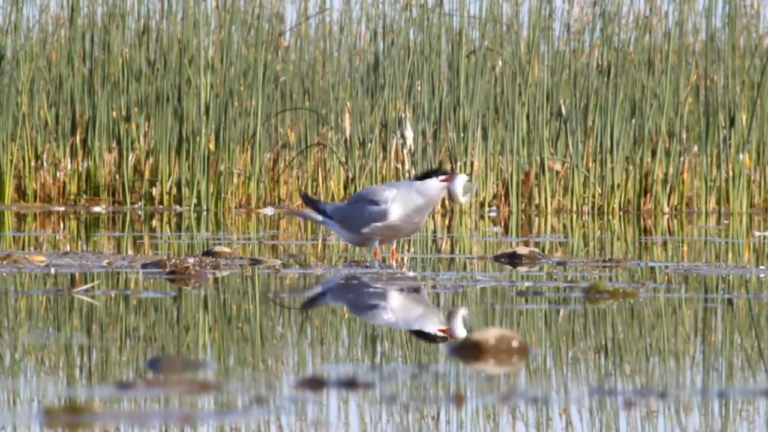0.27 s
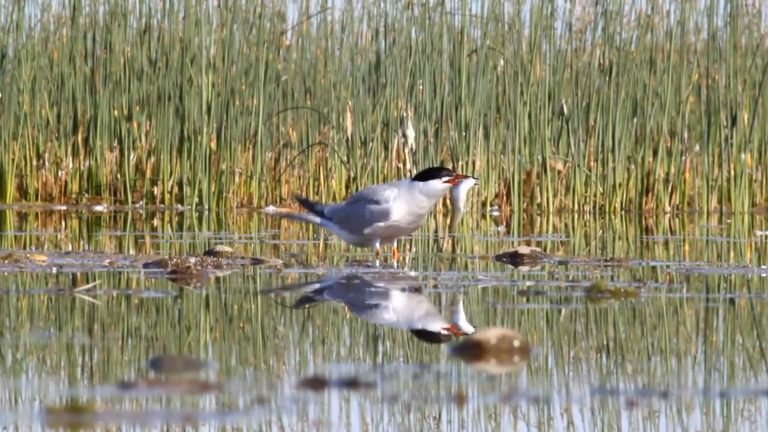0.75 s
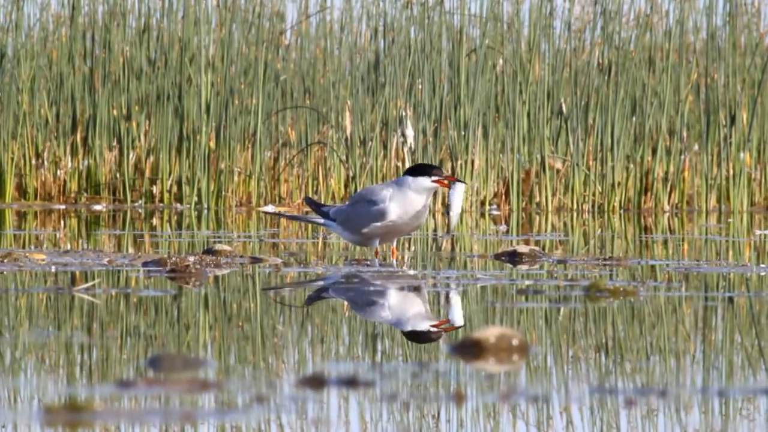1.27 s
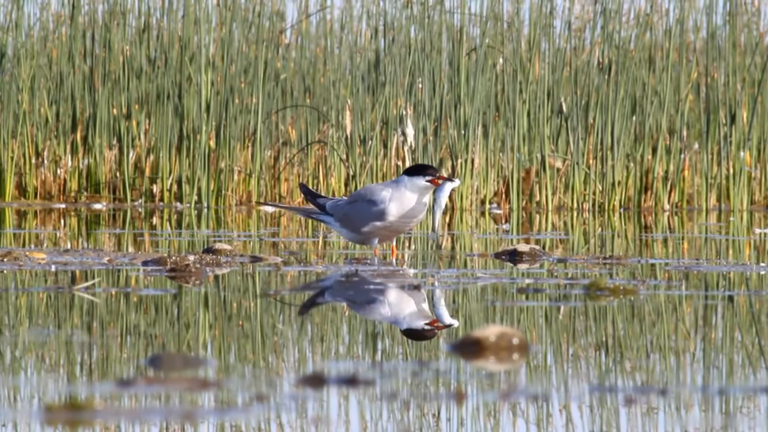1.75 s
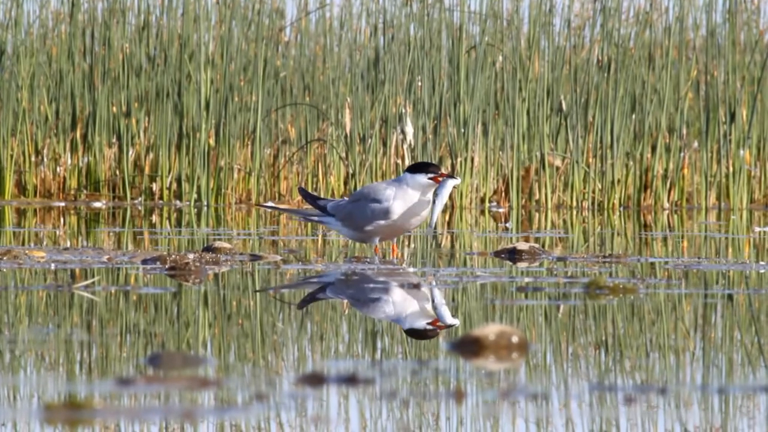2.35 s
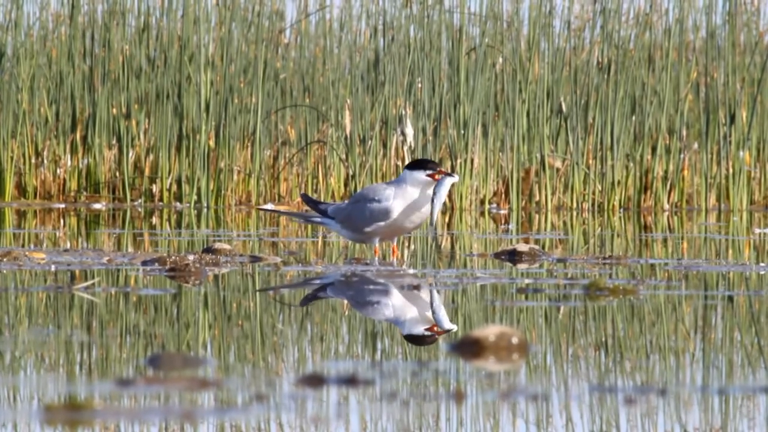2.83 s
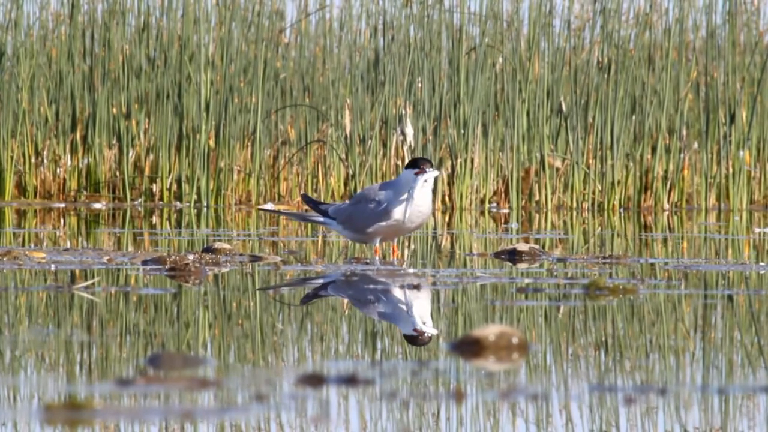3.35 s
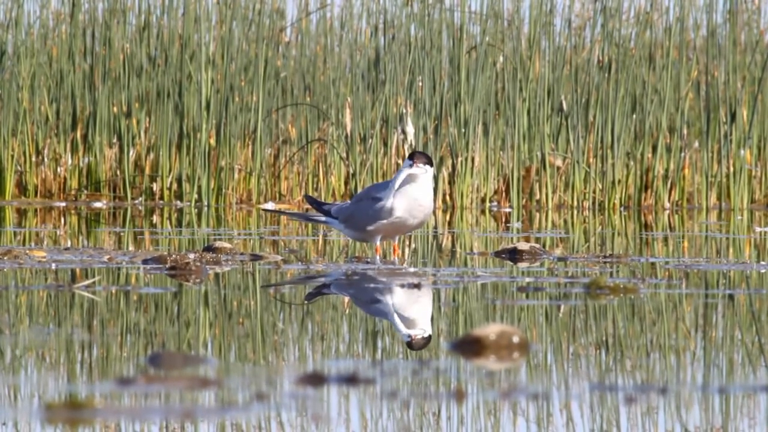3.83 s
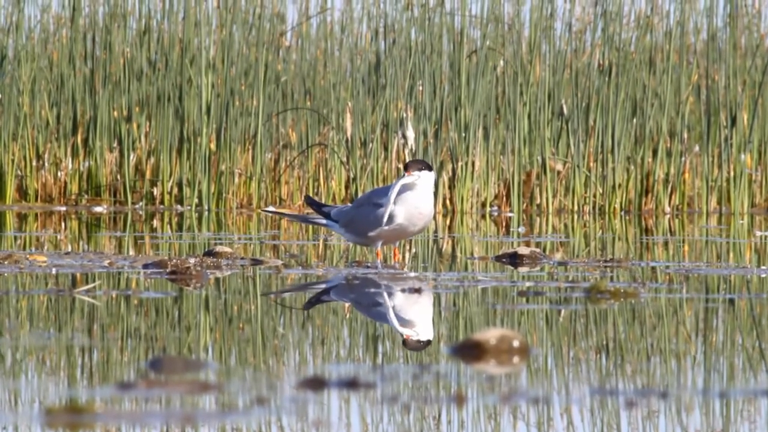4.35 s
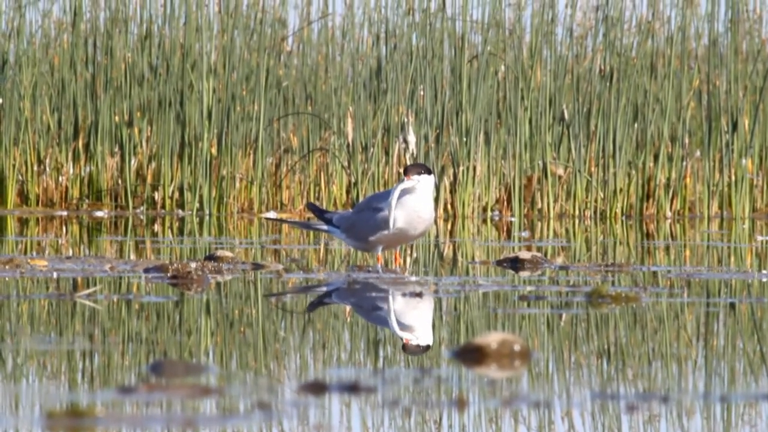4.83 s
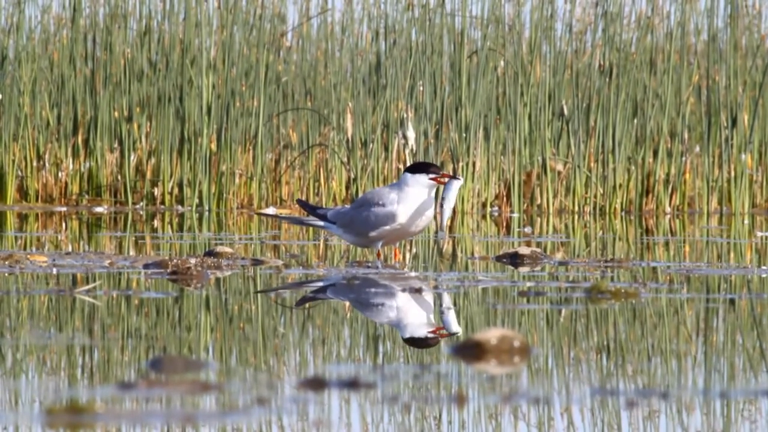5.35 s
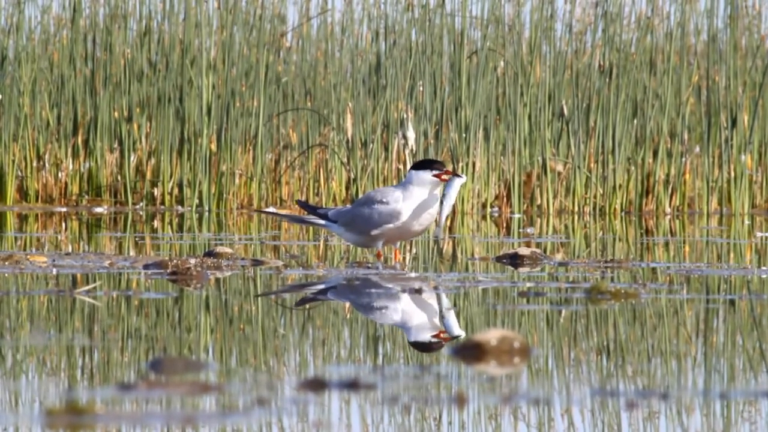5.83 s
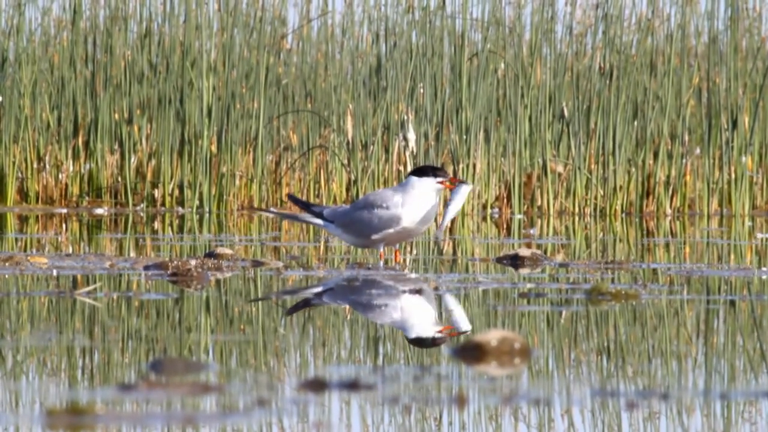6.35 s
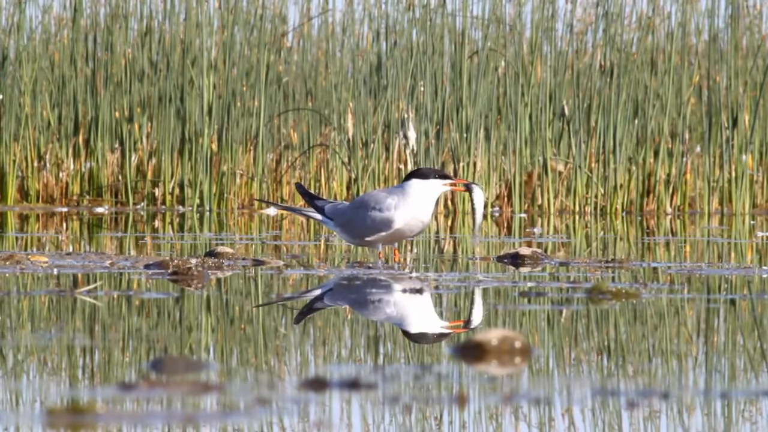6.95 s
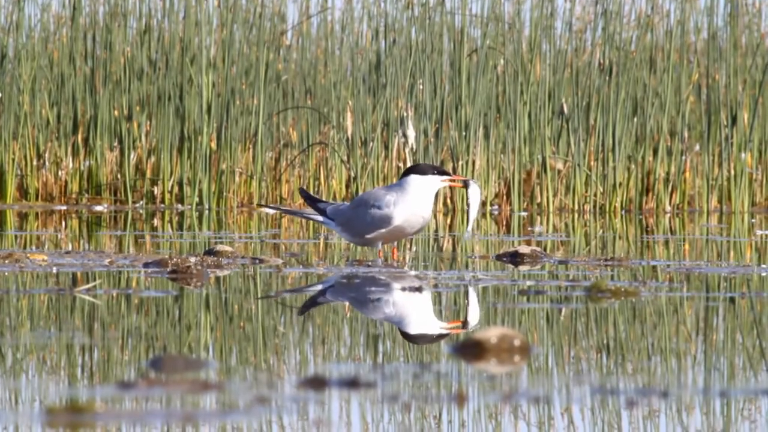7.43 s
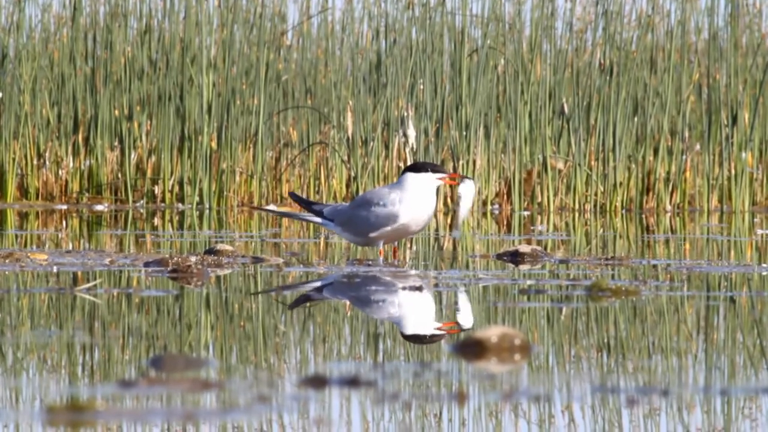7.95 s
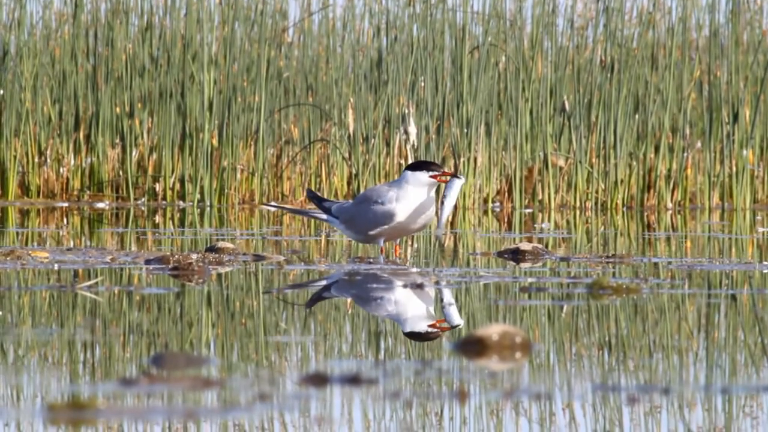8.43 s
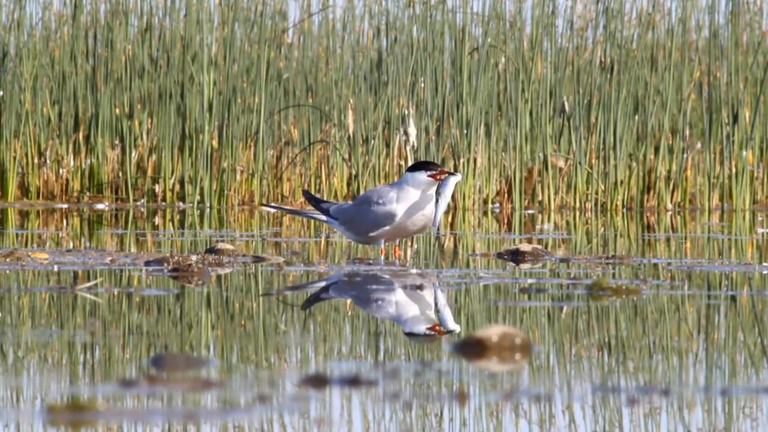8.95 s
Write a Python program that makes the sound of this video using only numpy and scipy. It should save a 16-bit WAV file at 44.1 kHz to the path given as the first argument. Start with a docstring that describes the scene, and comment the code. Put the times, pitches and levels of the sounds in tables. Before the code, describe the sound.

A faint, steady distant rumble and an even open-air hiss run throughout, outdoors by shallow water and reeds. At about 2.1 seconds there is one small, bright tick. A tern then gives five harsh calls, at about 2.8, 3.8, 5.8, 6.6 and 8.5 seconds, each a little under half a second long. Every call opens on a bright, high, rapidly fluttering tone, then falls and breaks into a louder, lower, chopped rasp, like kee-arr. The fourth is slightly softer than the others. The calls stand well above the background, and the reeds add only a very faint, short tail. Around 6 seconds a far-off low hum swells gently and sinks back into the rumble. At about 7.5 seconds comes one very faint, brief, almost pure distant note, probably another bird.

```python
"""In the shallows before a reed bed, a tern gives five harsh, falling "kee-arr" calls.
Each is a bright syrinx tone, coloured by throat and bill, that flutters about 35 times a second;
near the end the flutter chops it and the voice breaks to a low rasp. There is one small tick and
one faint, brief distant note, probably another tern. The reeds answer with a faint tail.
Underneath lies a bed of steady distant rumble and hiss, with a far-off hum that swells once."""
import sys
import numpy as np
from scipy import signal
from scipy.fft import rfft, irfft, next_fast_len
from scipy.io import wavfile
from scipy.ndimage import uniform_filter1d, map_coordinates

SR = 44100
rng = np.random.default_rng(int(sys.argv[2]) if len(sys.argv) > 2 else 0)


def bounce(signal):
    """Save signal as a 16-bit WAV file at the path given by the first command-line argument."""
    frames = np.transpose(np.atleast_2d(signal))
    limited = np.clip(frames, -1, 1)
    pcm = np.round(limited * 32767).astype(np.int16)
    wavfile.write(sys.argv[1], SR, pcm)


N = 405279

# Cue list of the calls: start/s, kee/s, rasp/s, tail/s, end/s, top pitch/Hz, rasp pitch/Hz,
# scoop into the kee/share of pitch, level trim/dB, tilt/(dB per octave), roughness/0-1,
# mid-kee beat lag/s
CALL_CUES = [(2.8155, 2.835, 3.098, 3.154, 3.212, 1770, 1196, .025, .3, 1.1, .27, .0025),
             (3.830, 3.874, 4.102, 4.129, 4.202, 1770, 1153, .015, 1, 1.2, .36, 0),
             (5.763, 5.763, 6.020, 6.075, 6.123, 1795, 1190, .085, .3, 0, .08, .0005),
             (6.573, 6.573, 6.823, 6.904, 6.953, 1752, 1156, .06, -2.3, -.9, .3, -.0015),
             (8.529, 8.543, 8.830, 8.911, 9.005, 1802, 1178, -.015, .2, -1.3, .25, .005)]
# Raw harmonics of the syrinx: harmonic number, relative level/dB
SYRINX_HARMONICS = [(1, 2), (2, 5.5), (3, -1), (4, -12.5), (5, -22.5), (6, -26.5), (7, -30), (8, -33),
                    (9, -35), (10, -38), (11, -41)]
# Resonances of throat and bill, heard across the water: f/Hz, gain/dB
THROAT_EQ = [(1150, 8), (1500, 6), (1750, -3.5), (2200, -2.5), (2480, 4), (2740, -2.5), (3020, 7.5),
             (3130, 5), (3290, -8), (3470, 1.3), (3900, -13.5), (4600, 9.5), (5070, -.7), (5300, 3),
             (5650, -2), (5900, 1.5), (6200, -2), (7000, -1), (11200, -2), (12400, 1), (14000, -1.5)]
# All calls share three envelopes over the stages 0 lead-in, 1 kee, 2 rasp, 3 tail, 4 end.
# Pitch rises to the kee, falls into the rasp and lifts in the tail: stage, pitch/share of top pitch
PITCH_ENVELOPE = [(0, .77), (.55, .905), (.9, .92), (1, 1.002), (1.25, .997), (1.48, .973), (1.65, .957),
                  (1.76, .902), (1.87, .857), (2, .829), (2.9, .812), (3.35, .912), (3.7, .888), (4, .82)]
# Effort peaks just before the voice breaks: stage, level/dB, tilt/(dB per octave), top harmonics/dB
EFFORT_ENVELOPE = [(0, -37.5, -3, 0), (.6, -32, .5, 0), (1.15, -30.3, .5, 1.5), (1.45, -30.1, 0, -.4),
                   (1.7, -30.6, -.6, -1), (1.78, -28.5, -.5, -.5), (1.86, -24.7, .8, 0),
                   (1.96, -22.4, 1.4, 0), (2.15, -24.2, 3.8, -.5), (2.9, -24.6, 3.6, -.5),
                   (3.4, -30.6, .2, 0), (4, -33, 1.7, -.5)]
# How hard each flutter beat bites: stage, syrinx closure/s, sag/share of pitch
BITE_ENVELOPE = [(.4, .008, .11), (1, .0053, .11), (1.11, .0012, .11), (1.35, .0007, .145),
                 (1.72, .001, .13), (1.88, .0026, .13), (2, .0052, .11), (3, .008, .09), (3.6, .0095, .09)]
# A small tick, then a faint distant note: t/s, level/dB, ring f/Hz, t60/s, crack amount/0-1
SMALL_CUES = [(2.1495, -38.5, 2350, 0.017, .8), (7.545, -53, 2300, .07, .05)]
# Decay of the reed bed: f/Hz, t60/s
REED_DECAY = [(1000, .4), (3000, 0.42), (8000, 0.11)]
# The far-off hum: crest t/s, swell half length/s, f/Hz, half width/Hz, level/dB
HUM_SWELL = (5.95, .45, 172, 10, -51)
# Colour of the distant rumble: f/Hz, relative level/dB
RUMBLE_EQ = [(12, -56), (20, -22), (35, -15.5), (52, -5), (108, -0.5), (157, -1.5), (188, -2), (215, -4),
             (308, -12.5), (400, -11), (434, -14.7), (592, -17.2), (653, -15), (1000, -20), (1300, -28),
             (2200, -120)]
# Colour of the open-air hiss: f/Hz, relative level/dB
HISS_EQ = [(590, -33), (1000, -7.5), (1230, -3.5), (1380, -5), (1820, -6.5), (2270, -8.5), (3030, -10.5),
           (3950, -12.5), (8280, -19), (13400, -26), (15800, -30)]

LEAD_IN_S, LEAD_BEAT_S = .044, .025  # a full lead-in, and one stutter of it
FLUTTER_HZ, END_MARGIN_S = 35, .017  # no beat starts within the margin before a call's end
SCOOP_S = .025  # settling time of the pitch as the kee opens
BREAK_AFTER_S, BREAK_SOONER_S = .01, .0022  # the first rasp beat holds its pitch; each next breaks sooner
BREAK_CLEAR_S = .001  # the upper register is back this long before the next beat
RASP_DROP_DB = 1.3  # the low register is this much weaker
RUMBLE_DB, HISS_DB = -44, -58.5
HIGH_CUT_HZ = 15800


def tern():
    """The five calls with a low cut: so small a bird radiates no bass."""
    track = np.zeros(N)
    for cue in CALL_CUES:
        add(track, cue[0], call(*cue))
    return signal.sosfilt(signal.butter(4, 900, "highpass", fs=SR, output="sos"), track)


def call(start, kee, rasp, tail, end, top_hz, rasp_hz, scoop, trim_db, call_bright_db, roughness, lag):
    """One call: a fluttering harmonic tone whose partials slide through the throat's resonances."""
    t = np.arange(start, end + .02, 1 / SR)
    landmarks = [kee - LEAD_IN_S, kee, rasp, tail, end]
    beats = beat_times(start, kee, rasp, tail, end, lag)
    tension, = envelope(PITCH_ENVELOPE, landmarks, t)
    tension *= 1 - scoop * np.exp(-np.abs(t - kee) / SCOOP_S)
    effort_db, bright_db, top_db = envelope(EFFORT_ENVELOPE, landmarks, t)
    closure, _ = envelope(BITE_ENVELOPE, landmarks, beats)
    _, sag_share = envelope(BITE_ENVELOPE, landmarks, t)
    level_db = trim_db + effort_db + .5 * wobble(FLUTTER_HZ, len(t))
    sag, gate, push = flutter(t, beats, closure)
    # The voice strains when it is loud and collapses as the air runs out.
    strain = step(level_db + 26.5, 1.3)
    collapse = step(t - end + .0043, .004)
    upper_hz = top_hz * tension * (1 - sag_share * sag) * (1 - .27 * collapse)
    rasp_beats = beats[(beats > rasp - .5 / FLUTTER_HZ) & (beats < tail + .5 / FLUTTER_HZ)]
    pitch, low = voice_break(t, upper_hz, rasp_beats, rasp_hz)
    rough = roughness * low
    jitter = (.0033 + .013 * sag + .052 * rough) * wobble(900, len(t))
    drift = .0025 * wobble(127, len(t))
    phase = 2 * np.pi * np.cumsum(pitch * (1 + jitter + drift)) / SR
    k, gains = harmonics(pitch, low, strain, call_bright_db + bright_db, top_db)
    # In a break the upper register keeps beating against the lower one.
    clash = np.sin(2 * np.pi * np.cumsum(upper_hz - pitch) / SR)
    offsets = rng.uniform(0, 2 * np.pi, k.shape)
    tone = (gains * np.sin(k * (phase + .22 * rough * clash) + offsets)).sum(0)
    # Under strain a slower, unsteady vibration puts sidebands between the harmonics.
    buzz_hz = 600 * (1 + .1156 * wobble(120, len(t)))
    buzz = np.sin(2 * np.pi * np.cumsum(buzz_hz) / SR)
    grit = (.042 + .094 * sag + .11 * rough) * wobble(1400, len(t))
    shimmer = 1 + .14 * rough * clash + .093 * strain * buzz + grit
    air = breath(phase, rough + .15 * strain * sag)
    loudness = amp(level_db - .97 + 1.9 * push - .55 * sag - RASP_DROP_DB * low - 14.3 * collapse)
    fade_out = step(end + .0035 - t, .0023)
    return (tone * shimmer + air) * loudness * gate * fade_out


def beat_times(start, kee, rasp, tail, end, lag):
    """The flutter's rhythm: quick in any lead-in, shifted by lag in mid-kee, then even to the end."""
    lead = np.arange(kee - LEAD_BEAT_S, start + LEAD_BEAT_S / 2, -LEAD_BEAT_S)[::-1]
    first = [start] if kee - start > LEAD_BEAT_S / 4 else []
    progress = np.linspace(0, 1, round((rasp - kee) * FLUTTER_HZ), endpoint=False)
    held = kee + (rasp - kee) * progress + lag * np.sin(np.pi * progress)
    chop_s = (tail - rasp) / round((tail - rasp) * FLUTTER_HZ)
    chopped = np.arange(rasp, end - END_MARGIN_S, chop_s)
    return np.concatenate([first, lead, held, chopped])


def flutter(t, beats, closure, sag_s=.0035, attack_s=.00045, release_s=.0013, leak=.068, push_s=.0047):
    """At each beat the tension sags and the syrinx may close; the stored pressure then gives a push."""
    beats, closure = beats[:, None], closure[:, None]
    shut, reopen = beats - closure / 2, beats + closure / 2
    seal = 1 - np.exp(-(closure / .0019) ** 2)  # a very short closure does not seal
    depth = 1 + .113 * rng.standard_normal(beats.shape)
    sag = (depth * np.exp(-np.abs((t - shut) / sag_s) ** 2.5)).sum(0)
    closed = (seal * step(t - shut, release_s) * step(reopen - t, attack_s)).max(0)
    gate = (1 - (1 - leak) * closed) * step(t - reopen[0], attack_s)
    push = (seal * (t > beats) * np.exp(-np.abs(t - reopen) / push_s)).max(0)
    return sag, gate, push


def voice_break(t, pitch, beats, rasp_hz):
    """In each rasp beat the pitch jumps down and sinks a little; low (0-1) marks the low register."""
    low = np.zeros(len(t))
    for i, (this_beat, next_beat) in enumerate(zip(beats, beats[1:])):
        start, end = this_beat + BREAK_AFTER_S - i * BREAK_SOONER_S, next_beat - BREAK_CLEAR_S
        broken = step(t - start, .0004) * step(end - t, .00041)
        sinking_hz = rasp_hz * (1 - .055 * np.clip((t - start) / (end - start) - .5, -.5, .5))
        pitch = pitch + broken * (sinking_hz - pitch)
        low += broken
    return pitch, low


def harmonics(pitch, low, strain, bright_db, top_db):
    """Harmonic numbers and gains at even power: strain favours the second, the low voice is duller."""
    k, source_db = np.transpose(SYRINX_HARMONICS)[:, :, None]
    tilt_db = bright_db * np.log2(np.minimum(k, 3)) + top_db * (k > 3)
    dull_db = 5 * low * np.log2(np.maximum(k / 2, 1))
    pinch_db = 4.2 * strain * (1 - .7 * low) * np.abs(np.log2(k / 2))
    flicker_db = .95 * np.array([wobble(71.6, len(pitch)) for _ in k])
    gains = amp(source_db + tilt_db - dull_db - pinch_db + along(THROAT_EQ, k * pitch) + flicker_db)
    return k, gains / np.sqrt((gains ** 2).sum(0) / 2)


def breath(phase, rough):
    """Air puffs through once a cycle and scrapes in the throat where the voice is rough."""
    puffs = (1 + np.sin(phase)) * rng.standard_normal(len(phase))
    band = signal.butter(3, [2400, 5000], "bandpass", fs=SR, output="sos")
    scrape = unit(signal.sosfilt(band, puffs))
    return amp(-43) * puffs + amp(-11) * rough * scrape


def tick_and_far_note():
    """The tick is a bright crack with a small ring; the distant note is a brief, almost pure tone."""
    track, t = np.zeros(N), np.arange(SR // 8) / SR
    band = signal.butter(2, [3500, 5700], "bandpass", fs=SR, output="sos")
    for start, db, hz, t60, snap in SMALL_CUES:
        crack = .55 * snap * unit(signal.sosfilt(band, rng.standard_normal(len(t))))
        ring = (1 - .6 * snap) * np.sin(2 * np.pi * hz * t)
        add(track, start, amp(db - 60 * t / t60) * (crack + ring))
    return track


def reeds(x):
    """The reed bed scatters the sound into a short, slightly late reverb tail."""
    hz, t, spectrum = signal.stft(rng.standard_normal(SR // 2), SR, nperseg=256)
    decay = amp(-60 * t / along(REED_DECAY, hz)[:, None])
    tail = signal.istft(spectrum * decay * step(t - .012, .008), SR, nperseg=256)[1]
    return signal.fftconvolve(x, tail / np.linalg.norm(tail))[:N]


def hum():
    """A narrow, wavering band of noise rises out of the rumble and sinks again."""
    crest_s, half_s, centre_hz, width_hz, db = HUM_SWELL
    drone = unit(filtered(rng.standard_normal(N), lambda hz: np.exp(-((hz - centre_hz) / width_hz) ** 2)))
    swell = np.exp(-((np.arange(N) / SR - crest_s) / half_s) ** 2)
    return amp(db) * drone * swell


def open_air():
    """The bed: a steady distant rumble, slightly patchy, under an even hiss."""
    rumble = amp(RUMBLE_DB) * noise_bed(RUMBLE_EQ, patchy_db=1.26)
    return rumble + amp(HISS_DB) * noise_bed(HISS_EQ, patchy_db=-.15)


def noise_bed(eq, patchy_db):
    """Coloured noise of rms 1 with patches of random gain in time and frequency."""
    spectrum = signal.stft(rng.standard_normal(N), nperseg=1024)[2]
    patches = uniform_filter1d(rng.standard_normal(spectrum.shape), size=5, axis=0)
    patches = uniform_filter1d(patches, size=14, axis=1)
    noise = signal.istft(spectrum * amp(patchy_db * unit(patches)), nperseg=1024)[1][:N]
    return unit(filtered(noise, lambda hz: amp(along(eq, hz))))


def envelope(table, landmarks, t):
    """Read each column of an envelope at times t; landmarks are the times of its stages."""
    stage = np.interp(t, landmarks, np.arange(len(landmarks)))
    knots, *columns = np.transpose(table)
    return [np.interp(stage, knots, column) for column in columns]


def amp(db):
    """Decibels to gain."""
    return 10 ** (np.asarray(db) / 20)


def unit(x):
    """Scale to rms 1."""
    return x / np.sqrt(np.mean(x ** 2) + 1e-20)


def along(points, hz):
    """Read (f/Hz, value) points on a log frequency axis."""
    knots_hz, values = np.transpose(points)
    return np.interp(np.log(hz + 1), np.log(knots_hz + 1), values)


def step(t, width):
    """A soft switch from 0 to 1 around t = 0."""
    return .5 + .5 * np.tanh(t / width)


def wobble(rate, size):
    """A smooth random modulator, rate knots a second."""
    at = np.arange(size) * rate / SR
    return map_coordinates(rng.standard_normal(int(at[-1]) + 4), [at], mode="nearest")


def filtered(x, response):
    """Zero-phase EQ; response gives the gain at each frequency."""
    size = next_fast_len(N + SR // 2)
    return irfft(rfft(x, size) * response(np.fft.rfftfreq(size, 1 / SR)), size)[:N]


def add(track, start_s, sound):
    """Mix a sound into the track at its cue."""
    part = track[round(start_s * SR):][:len(sound)]
    part += sound[:len(part)]


def scene():
    """The mono mix: tern, tick and distant note, their echo off the reeds, open air and hum behind."""
    direct = tern() + tick_and_far_note()
    echo = amp(-33) * reeds(direct)
    return (direct + echo + open_air() + hum())[None]


def record(dry):
    """A brick-wall high cut on the whole mix."""
    return filtered(dry[0], lambda hz: hz < HIGH_CUT_HZ)[None]


dry = scene()
out = record(dry)
bounce(out)
```